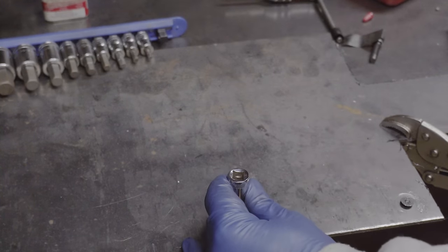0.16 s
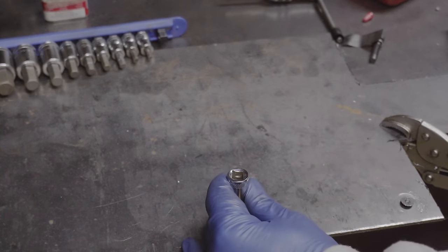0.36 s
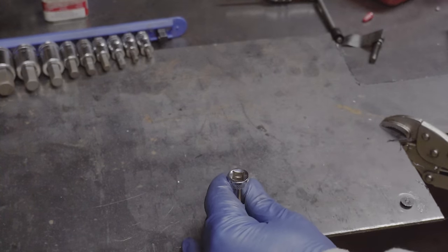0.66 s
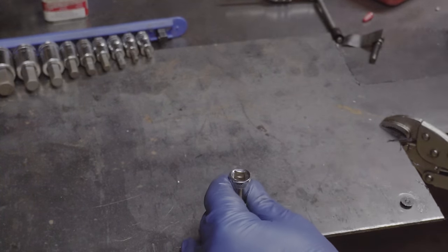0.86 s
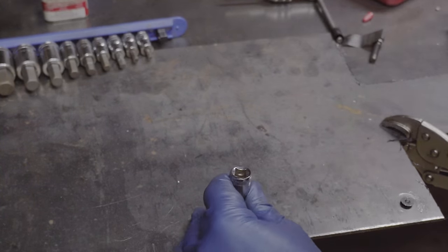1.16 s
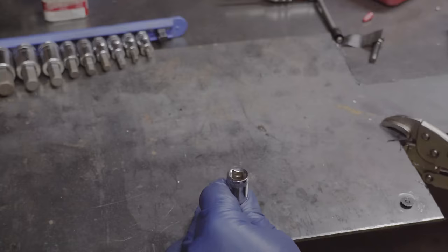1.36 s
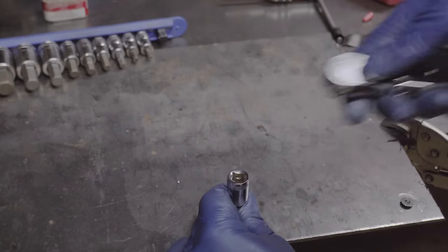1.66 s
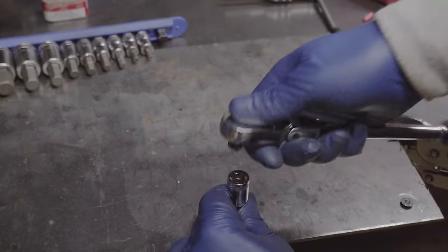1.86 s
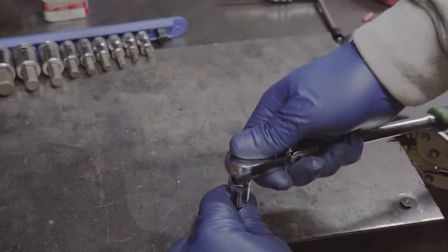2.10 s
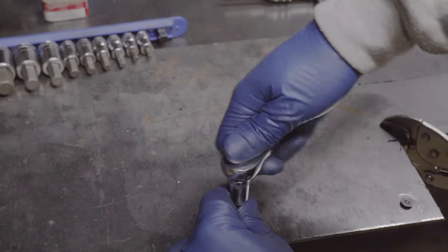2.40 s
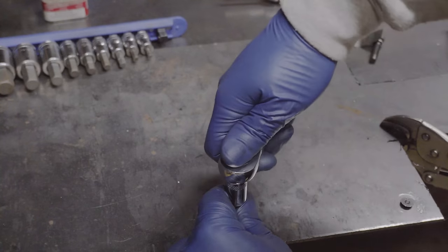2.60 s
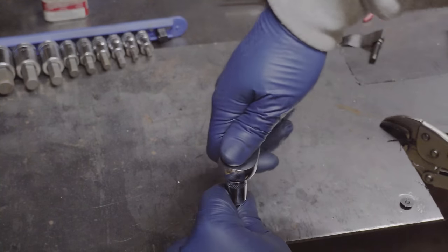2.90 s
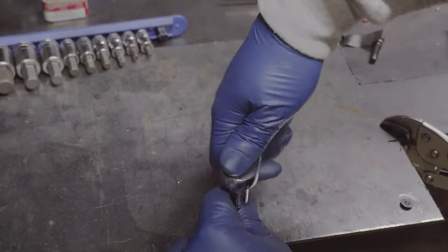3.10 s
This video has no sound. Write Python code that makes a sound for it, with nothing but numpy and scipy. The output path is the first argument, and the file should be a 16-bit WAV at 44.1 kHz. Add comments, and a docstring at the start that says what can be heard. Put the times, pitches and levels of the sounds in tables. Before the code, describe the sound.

A steel ratchet is fitted to a socket: one early knock, faint glove rustle, then a cluster of clinks and bright clicks and a final heavier clunk, heard close in a small, softly humming workshop.

```python
"""In a small workshop with a low hum, a gloved hand picks a ratchet off a steel bench and fits it onto a socket.
Steel knocks, small ticks and bright clicks are short noise contacts that excite decaying modes of the steel.
A soft thud is a smooth push on bench modes; glove rustle, faint rings and the hum are shaped noise.
The contacts and the thud also excite a diffuse room tail; all is heard on one close microphone."""
import sys
import numpy as np
from scipy import signal
from scipy.fft import rfft, irfft
from scipy.io import wavfile
from scipy.ndimage import uniform_filter1d

SR = 44100
rng = np.random.default_rng(int(sys.argv[2]) if len(sys.argv) > 2 else 0)


def wav_record(signal):
    """Record a signal, one row per channel, as 16-bit PCM in the file named by sys.argv[1]."""
    frames = np.transpose(np.atleast_2d(signal))
    bounded = np.clip(frames, -1, 1)
    # unit amplitude maps onto the largest positive 16-bit level
    quanta = np.round(bounded * 32767).astype(np.int16)
    wavfile.write(sys.argv[1], SR, quanta)


N = 143325
T = np.arange(N) / SR


def undb(db):
    """Decibel law: amplitude gain is 10 to the power dB / 20."""
    return 10 ** (np.asarray(db) / 20)


def decay(t, t60):
    """Exponential decay: the amplitude falls by 60 dB in t60 seconds."""
    return np.exp(-np.log(1000) * t / t60)


def colour(x, points):
    """Linear filtering: (Hz, dB) points, joined on a log frequency axis, weight the spectrum."""
    hz, db = np.array(points, float).T
    f = np.maximum(np.arange(len(x) // 2 + 1) * SR / len(x), 1)
    gain = undb(np.interp(np.log(f), np.log(hz), db))
    return irfft(rfft(x) * gain, len(x))


def unit(x):
    """Power normalisation: the mean square becomes 1."""
    return x / np.sqrt(np.mean(x ** 2))


def walk(rate):
    """Random modulation: held random values, rate per second, smoothed twice and scaled to rms 1."""
    k = int(SR / rate)
    steps = np.repeat(rng.standard_normal(N // k + 1), k)
    return unit(uniform_filter1d(uniform_filter1d(steps, k), k)[:N])


def band(hz, width):
    """Band limitation: white noise through a band-pass filter, at rms 1."""
    edges = [max(hz - width / 2, 20), min(hz + width / 2, .45 * SR)]
    sos = signal.butter(2, edges, "band", fs=SR, output="sos")
    return unit(signal.sosfilt(sos, rng.standard_normal(N)))


def ring(modes, size=8192):
    """Modal superposition: an impulse response is a sum of decaying sines."""
    t = np.arange(size) / SR
    return sum(undb(db) * np.sin(2 * np.pi * hz * t) * decay(t, max(t60, .003)) for hz, db, t60 in modes)


def add(out, at_s, x):
    """Superposition: mix x into out from a given time."""
    i = int(at_s * SR)
    out[i:i + len(x)] += x[:N - i]


# Spectrum of the workshop hum. Each row: frequency in Hz, relative level in dB.
HUM_SPECTRUM = [(25, -50.5), (50, -34.5), (92, -15.5), (140, -6.5), (175, -9.5), (372, -22.5), (505, -31),
                (811, -29), (1340, -40), (11000, -44.5), (15500, -51.5)]
HUM_DB, HUM_SWELL_DB = -64, 1.5  # mean level, rms swell


def hum():
    """Random noise with a low-weighted spectrum, amplitude modulated by a slow swell."""
    noise = unit(colour(rng.standard_normal(N), HUM_SPECTRUM))
    return noise * undb(HUM_DB + HUM_SWELL_DB * walk(8.4))


# Reverberation of the workshop. Each row: frequency in Hz, t60 in seconds, relative level in dB.
ROOM_DECAY = [(134, 0.83, -3.5), (307, 0.42, 0), (510, .3, -6.5), (790, 0.33, -2), (1470, 0.29, -7.5),
              (3240, 0.28, -6), (5300, 0.23, -2), (11750, 0.15, -4.5)]
ROOM_RISE_S = .003
EARLY_DB, EARLY_T60_S = 9.5, 0.019  # near surfaces, over the start of the tail


def room(x, size=24000):
    """Diffuse reverberation: half-octave noise bands decay exponentially, each at its own rate."""
    t, tail = np.arange(size) / SR, 0
    start = (1 - np.exp(-t / ROOM_RISE_S)) * (1 + undb(EARLY_DB) * decay(t, EARLY_T60_S))
    at, t60s, dbs = np.array(ROOM_DECAY).T
    for hz in 100 * 2 ** np.arange(0, 7.3, .5):
        t60, db = (np.interp(np.log(hz), np.log(at), v) for v in (t60s, dbs))
        noise = band(hz, hz * .36)[:size]
        fade = decay(t, t60) * start
        for _ in range(2):  # many close echoes: no single frequency or moment stands out
            spectrum = rfft(noise * fade, 2 * size)
            size_of = np.abs(spectrum)
            noise = irfft(spectrum * uniform_filter1d(size_of, int(hz / 6)) / size_of)[:size]
            power = uniform_filter1d(noise ** 2, int(8 * SR / hz) + 400)
            noise = noise / np.sqrt(power + 1e-12)
        noise = noise * fade
        tail = tail + undb(db) * noise * np.sqrt(hz / SR / np.sum(noise ** 2) * 2)
    return signal.fftconvolve(x, tail)[:N]


# Glove and sleeve rubbing. Each row: time in seconds, rms level in dB, lean to the treble in dB.
RUSTLE_COURSE = [(0, -67.5, -6), (.15, -82, 7), (.33, -78.5, -3.5), (.42, -69.5, -2.5), (0.459, -63, -9),
                 (.56, -58, -1.5), (.66, -68.5, -10), (.85, -64.5, -2.5), (.95, -57.5, 1), (1.03, -66, 0),
                 (1.12, -66, 2), (1.3, -72, -2.5), (1.47, -71, 3), (1.53, -85, 3.5), (1.577, -56, -5.5),
                 (1.75, -70.5, 0.5), (1.88, -69, 0.5), (1.95, -63, -3), (2.1, -79.5, -7), (2.42, -62, -4),
                 (2.451, -57, -10.5), (2.72, -70, -4.5), (2.802, -70, -3), (2.928, -69.5, -4),
                 (3.25, -52.5, -5)]
# Spectrum of the rubbing before the lean. Each row: frequency in Hz, relative level in dB.
RUSTLE_SPECTRUM = [(150, -10.5), (500, -2), (1200, -4), (2500, -11), (4500, -7), (9000, -19),
                   (16000, -32.5)]
# One short glove hiss, a single row: start in seconds, length in seconds, centre in Hz, width in Hz,
# level in dB.
GLOVE_HISS = (.871, .026, 8000, 6000, -58)
RUSTLE_FLICKER_DB = 1.6  # rms in the low half, twice that in the high half


def rustle():
    """Friction noise: glove and sleeve rub, flickering in low and high halves, with one short hiss."""
    s, db, tilt = np.array(RUSTLE_COURSE).T
    rub = colour(rng.standard_normal(N), RUSTLE_SPECTRUM)
    low = signal.sosfilt(signal.butter(2, 2500, fs=SR, output="sos"), rub)
    high = rub - low
    lean = np.interp(T, s, tilt)
    low = low * undb(RUSTLE_FLICKER_DB * walk(110) - lean)
    high = high * undb(2 * RUSTLE_FLICKER_DB * walk(180) + lean)
    at, length, hz, width, hiss_db = GLOVE_HISS
    swell = np.sin(np.pi * np.clip((T - at) / length, 0, 1))
    hiss = band(hz, width) * undb(hiss_db) * swell
    return unit(low + high) * undb(np.interp(T, s, db)) + hiss


# Faint sustained rings. Each row: start in seconds, end in seconds, centre in Hz, width in Hz, level in dB.
FAINT_RINGS = [(.485, .62, 1230, 70, -66), (.5, .64, 2900, 500, -68), (.82, 1.4, 1735, 110, -67),
               (2.58, 2.98, 1180, 30, -70), (2.72, 2.97, 2080, 130, -75)]


def rings():
    """Narrow-band noise: a small bandwidth is heard as a wavering tone, here softly begun and faded."""
    out = 0
    for a, b, hz, width, db in FAINT_RINGS:
        u = np.clip((T - a) / (b - a), 0, 1)
        out = out + band(hz, width) * undb(db) * np.minimum(u * 10, 1) * (1 - u ** 2)
    return out


# Soft thud on the bench. Each row: start in seconds, peak in dB before room and microphone.
SOFT_THUDS = [(1.5615, -34.5), (1.573, -37.5)]
# Modes of the bench. Each row: frequency in Hz, relative level in dB, t60 in seconds.
BENCH_MODES = [(115, -35, 0.096), (260, 3, 0.026), (316, -3, 0.11), (342.4, 2.5, 0.051), (401, 10, 0.061),
               (900, -24, .03)]
THUD_MS = 0.84  # time scale of the push


def thuds():
    """Soft impact: a smooth push favours the low modes of the bench."""
    out, t = np.zeros(N), np.arange(512) / SR * 1000 / THUD_MS
    push = t * np.exp(-t * 3)
    thud = signal.fftconvolve(push, ring(BENCH_MODES))
    for s, db in SOFT_THUDS:
        add(out, s, undb(db) * thud / np.abs(thud).max())
    return out


# Frequencies at which the colour of a contact is set, each entry in Hz.
COLOUR_HZ = [60, 250, 750, 1750, 3700, 6200, 10000, 16000]
# Colour shared by all contacts, each entry the level in dB at the matching frequency above.
CONTACT_COLOUR_DB = [7.2, 25.7, 27.3, 26.16, 20.7, 17.5, 15, 1.2]
EVEN = .75  # how far the chance colour of a contact is evened out, 0 to 1
MODE_DETUNE, MODE_SCATTER_DB = .006, 2.5  # random spread per contact: fraction of frequency, level
RING_DB, FAR_RING_DB = -33, -11  # ring of every contact; further change on the way to the walls


def hits(contacts, modes, lead=128):
    """Modal excitation: a short noisy chatter rings the modes in proportions that differ each time.

    Row 0 is heard close, row 1 goes out to the walls with less ring.
    """
    out, t = np.zeros((2, N)), np.arange(8192) / SR
    chance = rng.standard_normal((len(contacts), 8192))
    shares = rng.standard_normal((len(contacts), len(modes), 2))
    for contact, push, share in zip(contacts, chance, shares):
        s, db, bass_db, low_db, mid_db, high_db, top_db, ring_db, ms, first_db = contact
        fade = np.exp(-t * 1000 / max(ms, .1))
        spectrum = rfft(push * fade)
        push = irfft(spectrum / np.abs(spectrum) ** EVEN) * fade ** EVEN
        push = push / np.sqrt(np.sum(push ** 2))
        own = [[hz * (1 + MODE_DETUNE * a), mode_db + MODE_SCATTER_DB * b, t60]
               for (hz, mode_db, t60), (a, b) in zip(modes, share)]
        own[0][1] += first_db
        body = undb(RING_DB + ring_db) * signal.fftconvolve(push, ring(own))[:8192]
        tint = [bass_db, bass_db, low_db, mid_db, 0, high_db, top_db, top_db]
        points = list(zip(COLOUR_HZ, np.add(CONTACT_COLOUR_DB, tint)))
        for line, x in zip(out, (push + body, push + undb(FAR_RING_DB) * body)):
            x = colour(np.roll(x, lead), points)
            x[:lead] *= (np.arange(lead) / lead) ** 4  # soften what the filter puts before the contact
            add(line, s - lead / SR, undb(db) * x)
    return out


TICK_BASS_DB, TICK_LOW_DB = -10.5, -13.5


def small_hits(contacts, modes):
    """Small contacts radiate weak bass: fixed low bands, and half the treble tint in the low treble."""
    full = [(s, db, TICK_BASS_DB, TICK_LOW_DB, mid, top / 2, top, ring_db, ms, first_db)
            for s, db, mid, top, ring_db, ms, first_db in contacts]
    return hits(full, modes)


# Small ticks of loose parts and glove. Each row: start in seconds, gain in dB before the shared colour, tint
# of mids and treble in dB, ring in dB relative to the common ring, contact time constant in ms.
SMALL_TICKS = [(.436, -55.5, 6.5, 2, -17, 1.1), (.443, -67, -9, -6, -11, 0.55),
               (.485, -52.5, 6.5, 5.5, -20, 0.65), (0.6061, -44.5, -6.5, -15, -15, 2.6),
               (0.908, -40.5, -4.5, -6.5, -8, 10), (1.105, -64.5, 13.5, 7, -4, 3.2),
               (1.219, -62, -39, 1, -21, 1.6), (1.455, -63, 9, 0, 0.5, 5.8), (1.48, -62.5, 2, -1, -2, 4),
               (1.719, -54.5, -7, 0, -1, 3.8), (1.896, -70, 16, -16, -11, 3.5),
               (1.927, -53, 4.5, -21, -34.5, 7.8), (2.7465, -57.5, 8, -45, -20, 1.9)]
# Modes of the small steel parts. Each row: frequency in Hz, relative level in dB, t60 in seconds.
PART_MODES = [(4200, 3, .035), (8300, -6, .02), (11000, 6, .05)]


def ticks():
    """Light impacts: small steel parts have few, high modes."""
    return small_hits([(*row, 0) for row in SMALL_TICKS], PART_MODES)


# Bright clicks of socket on drive. Each row: start in seconds, gain in dB before the shared colour, tint of
# mids and treble in dB, ring in dB relative to the common ring, contact time constant in ms,
# change of the lowest mode in dB.
SOCKET_CLICKS = [(2.494, -33, -19, -0.78, 12, 2.8, -10), (2.511, -33.5, 2, -1.2, 10, 5.1, -15),
                 (2.535, -34, 0, -0.7, 0, 2.6, -15), (2.5732, -34, -18, -0.016, -2, 1.3, -15),
                 (2.9748, -37.5, -12, -0.017, 13.5, 0.79, -25), (2.998, -35, -4, 0.7, -5, 1.13, 19)]
# Modes of the socket wall. Each row: frequency in Hz, relative level in dB, t60 in seconds.
SOCKET_MODES = [(3650, -5, .012), (4500, 5, .011), (8700, -9, .012), (9750, -7, .015), (11600, -5, .015),
                (12400, -4, .015)]


def clicks():
    """Shell resonance: the drive strikes the socket, whose stiff wall rings high and briefly."""
    return small_hits(SOCKET_CLICKS, SOCKET_MODES)


# Steel knocks. Each row: start in seconds, gain in dB before the shared colour, tint of bass, low mids, mids,
# low treble and treble in dB, contact time constant in ms.
STEEL_KNOCKS = [(0.6549, -24.5, -2, 0, 8, 5, -8.5, 1.35), (0.6573, -41.5, -15, -42, 12, -12, -17, 0.85),
                (2.178, -19.5, -15, -2.5, 3.5, -10, -11, 5), (2.2559, -34, -13, -3, 7, -6, -21, 3.6),
                (2.2646, -26.5, -31, -41, 7, -3.5, -7.5, 2.5), (2.269, -20.5, -28, -0.5, 2, -0.5, -29, 1.5),
                (2.4543, -21, -6.5, -4, 1, -9, -5.5, 3.8), (2.4852, -23, -15.5, 6.5, 2, -11, -18, 0.59),
                (2.488, -21.5, -12, -25, 4.5, -16, -36, 5.1), (3.0911, -46.5, 17, 7, -4, 4, 1, 8.4),
                (3.0968, -33, 8, -7.5, -10, -6, -17, 7.6), (3.1025, -35, -17, -24, 12, 0, -4, 17),
                (3.109, -23, 0, 0, -7.5, -4, -13, 0.45), (3.115, -16, -16.5, 1.5, -7.5, -31, -33, 5.5),
                (3.1185, -13.5, -5.5, -5.5, -12, -10.5, -15.5, 3.1),
                (3.1221, -17.5, -16, -19, 5, -6.5, -21.5, 0.91)]
# Modes of ratchet and socket held in the hand. Each row: frequency in Hz, relative level in dB,
# t60 in seconds.
TOOL_MODES = [(148, -2, .35), (240, -9, .25), (403, -10, .22), (685, 3, .03), (925, 1, .025),
              (1575, 7, .013), (1960, -5, .012), (2550, -9, .012), (2880, -5, .012), (3750, -2, .012),
              (6150, -4, .015), (9720, -4, .025), (11600, -6, .02)]


def knocks():
    """Damped modal impact: steel tools held in the hand ring dully and die quickly."""
    return hits([(*row[:7], 0, row[7], 0) for row in STEEL_KNOCKS], TOOL_MODES)


ROOM_DB, MIC_LOW_HZ = 4.5, 102.6  # reverberation level, low cut on contacts, thud and their room


def scene():
    """Superposition: contacts and thud in the room add to rustle, rings and hum."""
    close, far = knocks() + ticks() + clicks() + thuds()
    low_cut = signal.butter(3, MIC_LOW_HZ, "high", fs=SR, output="sos")
    near = signal.sosfilt(low_cut, close + undb(ROOM_DB) * room(far))
    return (near + rustle() + rings() + hum())[None]


TOP_HZ = 16100


def record(dry):
    """Band limitation: the recorder's steep low-pass cuts the top."""
    return signal.sosfilt(signal.ellip(10, .2, 60, TOP_HZ, fs=SR, output="sos"), dry)


dry = scene()
out = record(dry)
wav_record(out)
```